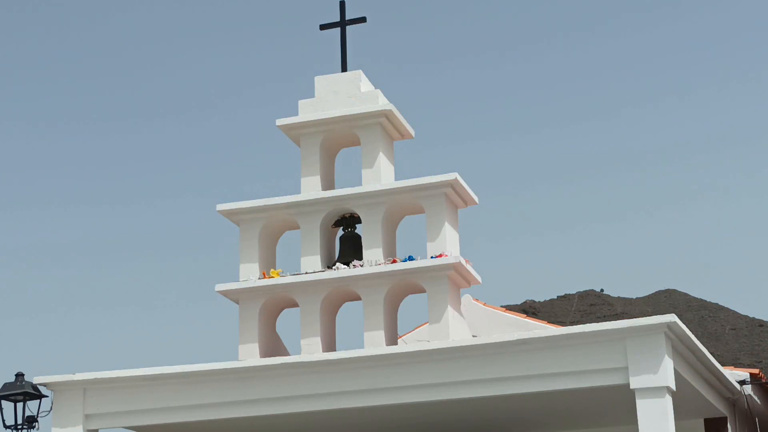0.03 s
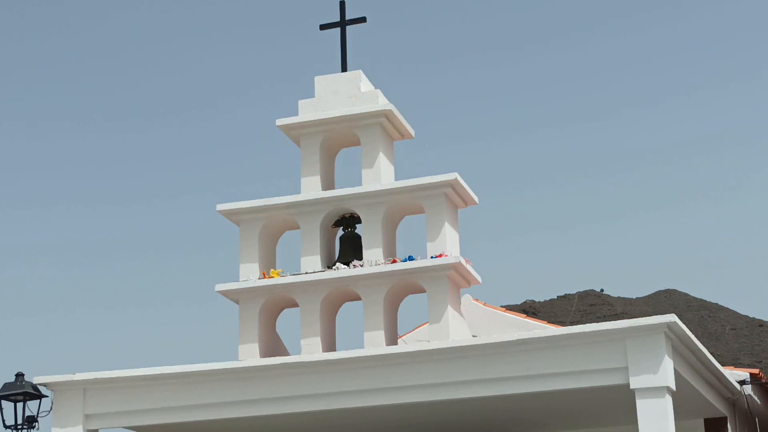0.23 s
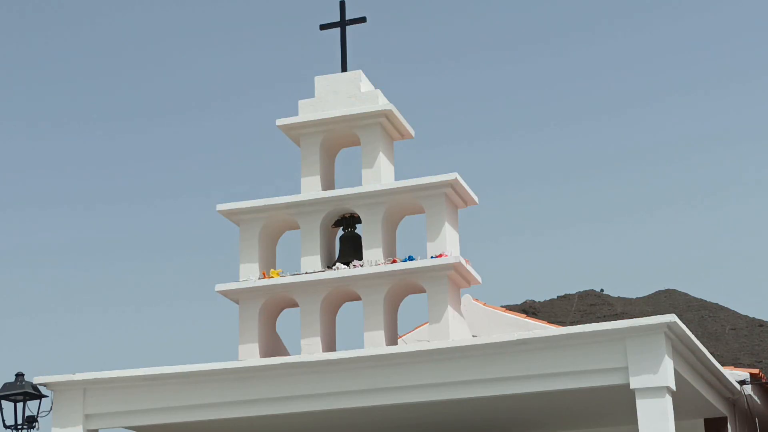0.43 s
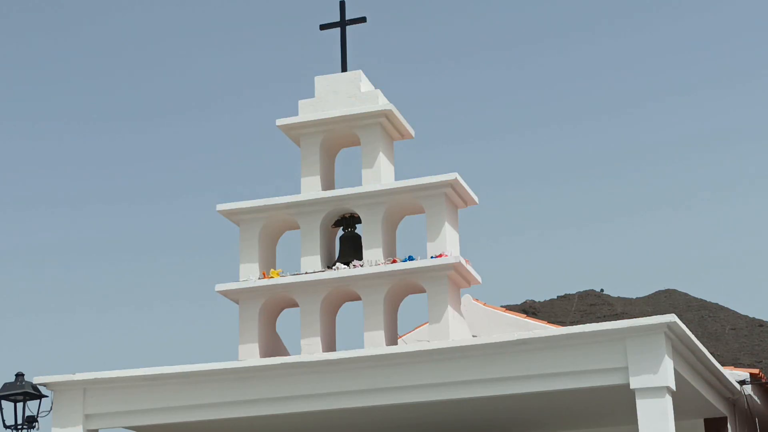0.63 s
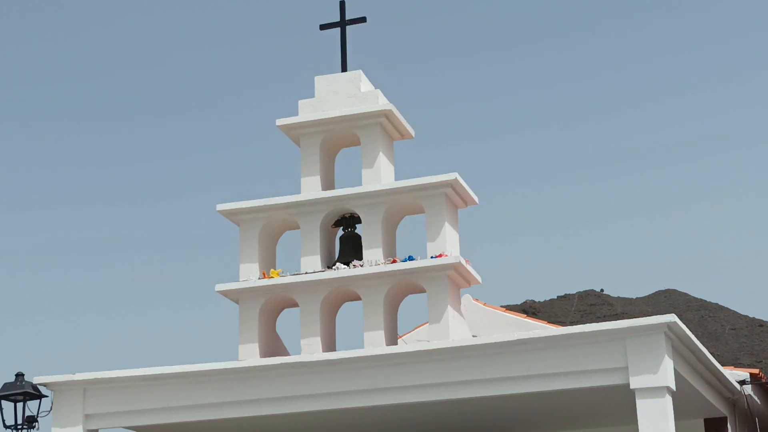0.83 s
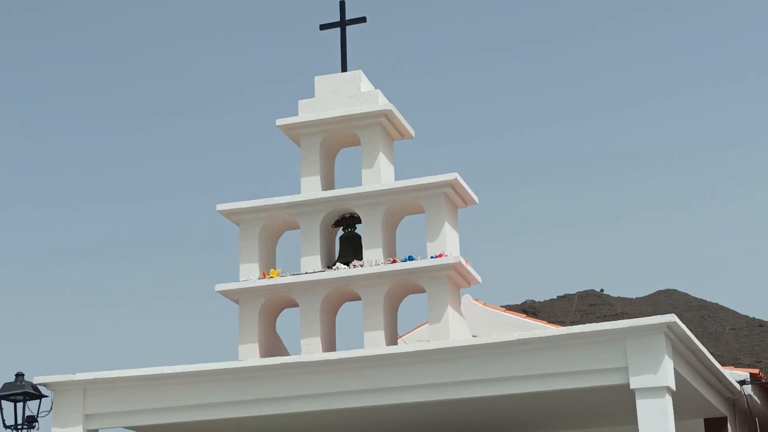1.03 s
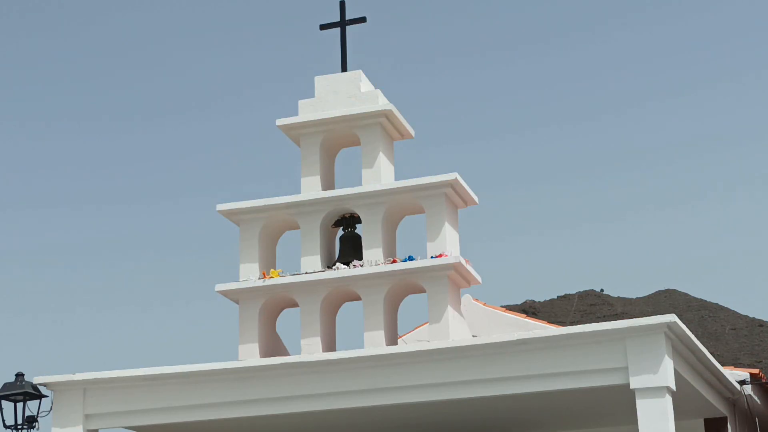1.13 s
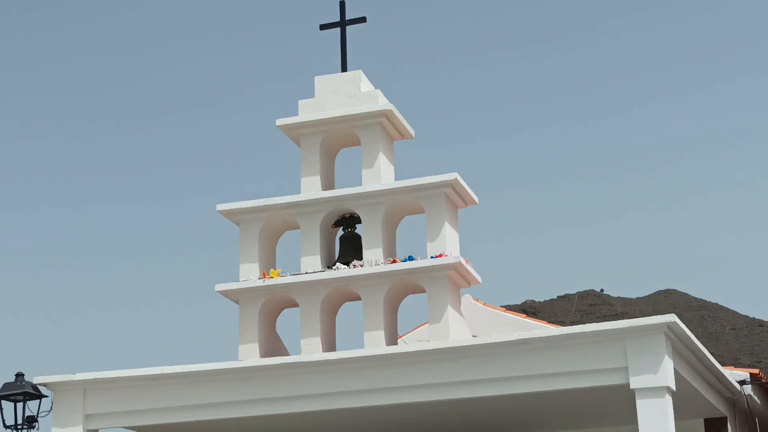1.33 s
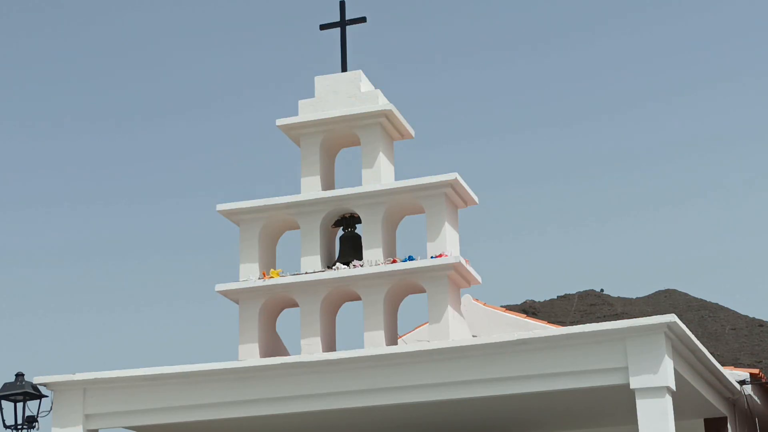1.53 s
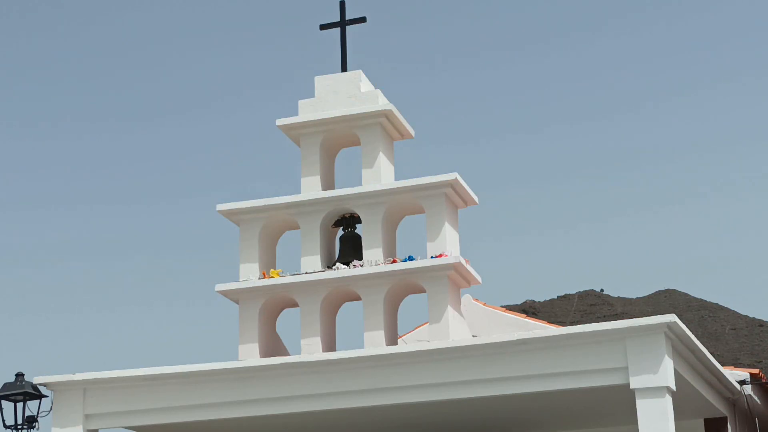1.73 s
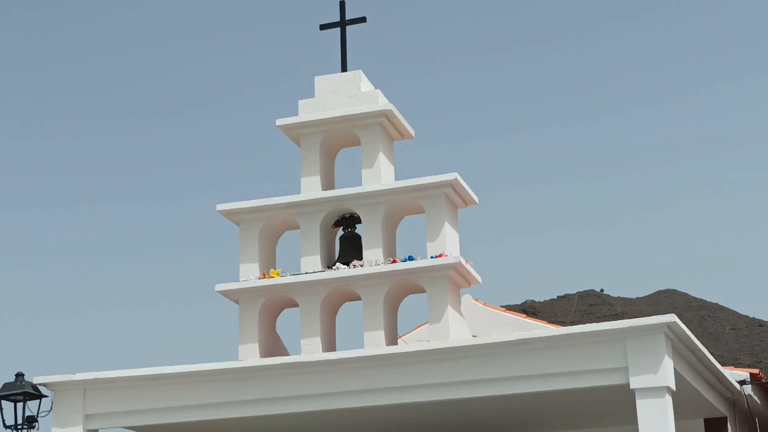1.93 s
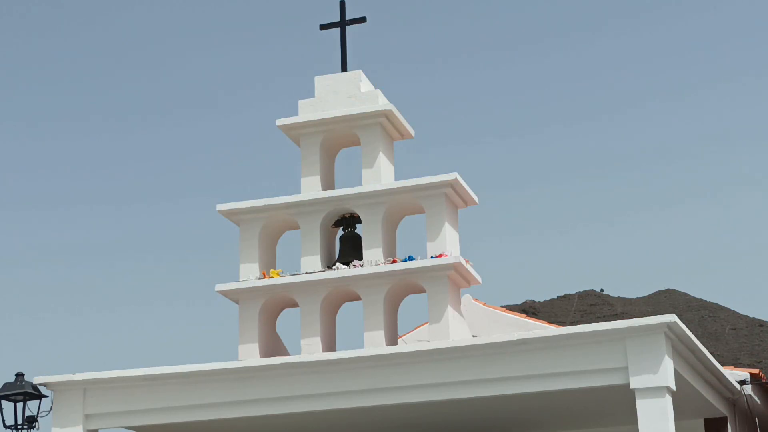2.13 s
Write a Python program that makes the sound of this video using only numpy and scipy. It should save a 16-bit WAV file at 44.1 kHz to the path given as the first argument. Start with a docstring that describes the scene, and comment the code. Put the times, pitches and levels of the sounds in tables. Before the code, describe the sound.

A small bronze church bell, still humming from an earlier stroke, is struck once early on; a hard bright clang rings and shimmers, then thins to a low hum, outdoors with light wind, in stereo.

```python
"""A small bronze bell on a chapel gable: its hum, two beating tones, still rings from the stroke before,
and two earlier partials ring as plain sines. Light wind, fluttering coloured noise and decaying sine bumps,
plays on two microphone ports over an open-air noise wash with rustles. A short coloured noise burst comes just
ahead of the one blow: a noise clank and split pairs of decaying sines that beat, while the earlier partials
fade. Walls answer with a diffuse noise tail as the ring dies away."""
import sys
import numpy as np
from scipy import signal
from scipy.fft import rfft, irfft
from scipy.io import wavfile
from scipy.ndimage import map_coordinates

SR = 44100
rng = np.random.default_rng(int(sys.argv[2]) if len(sys.argv) > 2 else 0)


def wav_out(sig):
    """Save sig, one row per channel (or a flat mono array), as 16-bit PCM at SR to the path in sys.argv[1]."""
    wavfile.write(sys.argv[1], SR, np.round(np.clip(np.atleast_2d(sig).T, -1, 1) * 32767).astype(np.int16))


def gain_from_db(level_db):
    """Convert decibel levels to linear amplitude factors (20 dB per decade)."""
    decades = np.asarray(level_db, float) / 20
    return 10 ** decades


N = 97020
T = np.arange(N) / SR
SIDES = np.array([[.5], [-.5]])  # left, right: share of any left-over-right difference
BLOW_S = .2462


def unit(x):
    """Scale to rms 1."""
    return x / np.sqrt(np.mean(x ** 2) + 1e-20)


def curves(rows):
    """One value per sample for each column after the time."""
    seconds, *columns = np.transpose(rows)
    return [np.interp(T, seconds, column) for column in columns]


def wobble(knots_per_s):
    """A smooth random curve through evenly spaced knots."""
    knots = rng.standard_normal(int(N * knots_per_s / SR) + 4)
    return map_coordinates(knots, [T * knots_per_s])


def noise(spectrum, alike):
    """Stereo noise of rms 1 with a spectrum shape; alike sets the correlation of the sides."""
    hz, db = np.transpose(spectrum)
    bins_hz = np.fft.rfftfreq(N, 1 / SR)
    gain = gain_from_db(np.interp(np.log(bins_hz + 1), np.log(hz + 1), db))
    mid, side = irfft(rfft(rng.standard_normal((2, N))) * gain, N)
    turn = np.arccos(np.clip(alike, -1, 1)) / 2
    return unit(np.cos(turn) * mid + 2 * SIDES * np.sin(turn) * side)


def burst(start_s, db, t60_s, spectrum, rise_s):
    """Centred noise that starts sharply and dies away."""
    t = np.maximum(T - start_s, 0)
    envelope = np.minimum(t / rise_s, 1) * gain_from_db(db - 60 * t / t60_s)
    return envelope * noise(spectrum, 1.0)


def pair(hz, swell_s, lead_rad, db, t60_s, pan_db, split_hz, twin_db, twin_t60_s, twin_pan_db, *troughs_s):
    """A partial and its twin, which opposes it at each side's beat trough."""
    t = np.maximum(T - BLOW_S, 0)
    phase = 2 * np.pi * (hz * t + rng.random()) + lead_rad * SIDES
    twin_phase = phase + 2 * np.pi * split_hz * (t - np.reshape(troughs_s, (2, 1)))
    partial = gain_from_db(db + pan_db * SIDES - 60 * t / t60_s) * np.sin(phase)
    twin = gain_from_db(twin_db + twin_pan_db * SIDES - 60 * t / twin_t60_s) * np.sin(twin_phase)
    swell = 1 - np.exp(-t / max(swell_s, 1e-3))
    return swell * (partial - twin)


# Strong split partials. Each row: frequency in Hz, swell time constant in s (at least 0.001 is used),
# left lead in rad, level in dB, t60 in s, left over right in dB, twin offset in Hz, twin level in dB,
# twin t60 in s, twin left over right in dB, beat trough after the blow in s on the left, then the right.
STRONG_PARTIALS = [(764.5, 0.3, -2.95, -22.3, 8.97, -1.6, -1.5, -31.9, 5.66, -1.4, 0.28, 0.079),
                   (1020.9, 0.167, 2.97, -25.1, 9.16, 0.0, 1.45, -40.6, 6.19, 8.9, 0.274, 0.022),
                   (1221.9, 0.11, -0.36, -24.4, 2.59, 3.5, 2.11, -27.6, 2.87, -0.5, 0.085, 0.109),
                   (1724.3, 0.001, -0.06, -9.5, 2.05, -0.5, -0.6, -10.9, 1.03, -1.5, 1.511, 1.606),
                   (1917.6, 0.003, -0.3, -15.6, 1.67, 0.8, -4.23, -28.5, 1.16, 2.6, 0.02, 0.022),
                   (1939.3, 0.006, -0.55, -27.6, 1.58, 7.1, 1.71, -28.2, 2.04, 1.2, 0.421, 0.383),
                   (2097.4, 0.016, 0.03, -20.0, 0.9, -2.3, -3.77, -33.8, 1.15, -1.7, 0.043, 0.058),
                   (2293.9, 0.008, -1.01, -18.8, 0.7, 3.8, 2.17, -23.5, 0.83, -5.9, 0.036, 0.46),
                   (2489.7, 0.009, 0.31, -28.6, 0.88, 8.3, 1.44, -36.4, 1.4, 0.6, 0.086, 0.277),
                   (2593.9, 0.018, -0.96, -16.5, 1.92, 6.5, 1.07, -26.9, 2.18, 9.5, 0.08, 0.219),
                   (2700.4, 0.008, 0.7, -24.9, 1.63, 6.8, -1.45, -28.4, 1.16, 11.7, 0.085, 0.066),
                   (3169.4, 0.12, -2.21, -36.1, 1.62, -4.4, -0.99, -27.5, 1.33, -3.2, 0.431, 0.813),
                   (3302.9, 0.001, -1.41, -31.1, 1.03, 1.4, -1.0, -27.4, 1.47, 1.5, 0.094, 0.02),
                   (3398.9, 0.001, -2.74, -36.0, 0.97, -5.1, -1.07, -41.1, 1.07, 16.3, 0.009, 0.452),
                   (3474.2, 0.081, -1.08, -22.9, 1.01, 0.6, -0.91, -27.8, 0.76, 9.0, 1.009, 0.213),
                   (3560.8, 0.009, 0.43, -10.0, 1.52, -1.2, 1.32, -28.2, 1.79, -3.7, 0.095, 0.121),
                   (4604.5, 0.12, -0.72, -20.4, 1.13, -7.7, -2.55, -23.4, 1.4, -4.6, 0.357, 0.349),
                   (4940.4, 0.001, 0.33, -46.6, 1.48, -2.4, -1.14, -44.8, 1.11, -2.0, 0.621, 0.569),
                   (5224.1, 0.007, 0.35, -40.4, 1.22, -3.9, 2.45, -50.7, 1.49, 1.2, 0.148, 0.16),
                   (5702.7, 0.072, -0.47, -34.7, 1.64, -6.0, 0.6, -34.6, 1.2, 4.7, 0.434, 1.0),
                   (6120.8, 0.005, -2.62, -41.1, 1.05, -6.2, -4.7, -43.8, 0.76, -15.8, 0.155, 0.011),
                   (6848.1, 0.12, -0.59, -30.6, 1.0, 7.5, -7.76, -40.3, 1.31, -14.7, 0.044, 0.09),
                   (8005.2, 0.12, -0.55, -42.4, 1.27, -0.4, -1.8, -39.5, 0.66, -12.8, 0.478, 0.088),
                   (9180.6, 0.114, -1.01, -36.2, 0.59, 6.1, -6.64, -51.8, 1.03, 6.0, 0.075, 0.039),
                   (10350.8, 0.029, 1.92, -50.1, 1.06, 20.0, -2.69, -45.3, 0.73, 7.9, 0.323, 0.257)]


def strong_partials():
    """Each bell mode splits into two close tones that beat as they decay."""
    return sum(pair(*row) for row in STRONG_PARTIALS)


# Weak upper partials. Each row: frequency in Hz, level in dB, t60 in s, left over right in dB.
WEAK_PARTIALS = [(3923, -46.5, 1.4, -2.9), (3931.5, -43.3, 1.4, -5.9), (4103.5, -43.2, 1.4, 5.1),
                 (4126, -36.2, 1.4, -1.5), (4203, -45.4, 1.4, -2.7), (4215, -47.3, 1.4, -3.4),
                 (4443, -48.0, 1.4, -5.4), (4760, -41.4, 1.03, 5.6), (5351, -43.7, 1.4, -1.3),
                 (5646, -53.2, 1.33, -8.1), (6163, -46.3, 0.87, -2.9), (6259, -50.2, 1.4, 2.1),
                 (6540, -47.0, 0.86, 0.9), (6777.5, -47.8, 1.11, 4.5), (7370, -58.4, 0.84, -14.0),
                 (8145.5, -56.4, 0.99, 5.9), (8173.5, -51.0, 1.03, 8.7), (8615, -53.6, 1.07, 12.3),
                 (8690, -57.7, 0.98, 11.6), (9821.5, -55.6, 1.02, 14.0), (9835, -55.6, 1.03, 14.0),
                 (10020, -57.9, 0.74, 14.0), (10110, -61.3, 0.97, 14.0), (10811, -61.3, 0.88, 4.8),
                 (11248, -67.8, 0.83, 12.0), (11329, -98.7, 1.4, 14.0), (11515, -55.8, 0.78, 9.0),
                 (11801.5, -61.3, 0.77, 14.0), (12399, -59.2, 0.43, 14.0), (12666, -63.8, 0.81, 8.6),
                 (13046, -79.4, 1.4, 0.8), (13825, -72.4, 0.7, 12.9), (14961, -80.6, 0.94, 8.3)]


def upper_partials():
    """Weak high modes, each split at random from a slightly weaker twin."""
    split_scale_hz, twin_db, swell_s = 4.8, -2.5, 0.0032
    out = 0
    for hz, db, t60_s, pan_db in WEAK_PARTIALS:
        split, lead, left_s, right_s = rng.uniform(-0.92, 1, size=4)
        out += pair(hz, swell_s, np.pi * lead, db, t60_s, pan_db,
                    split_scale_hz * split, db + twin_db, t60_s, pan_db, left_s, right_s)
    return out


# Partials left from the stroke before: frequencies in Hz.
EARLIER_PARTIAL_HZ = [764.5, 1021]
# Each row, one for each frequency: level in dB, left over right in dB, left lead in rad.
EARLIER_PARTIALS = [(-35.5, -1.5, 2.2), (-43, 7.5, 2.8)]


def earlier_ring():
    """Steady sines from the stroke before, fading exponentially from the blow on."""
    fade_s = 0.09
    fade = np.exp(-np.maximum(T - BLOW_S, 0) / fade_s)
    out = 0
    for hz, (db, pan_db, lead_rad) in zip(EARLIER_PARTIAL_HZ, EARLIER_PARTIALS):
        out += fade * gain_from_db(db + pan_db * SIDES) * np.sin(2 * np.pi * hz * T + lead_rad * SIDES)
    return out


def bell():
    """The new ring, and the old one that it replaces."""
    return strong_partials() + upper_partials() + earlier_ring()


# Hum through the stroke. Each row: time in s, hum level in dB, twin level in dB, left over right in dB.
HUM_LEVELS = [(0, -29.5, -44, -4.5), (.24, -31.5, -40, 2.5), (.34, -26.5, -64, 1.5),
              (.62, -24.5, -57, -2.5), (1.1, -24.5, -50.5, -2), (1.48, -25.5, -51, 3),
              (2.0, -29.5, -43.5, 2), (2.2, -30, -44, 2)]


def hum():
    """The lowest partial and its flat twin, opposed at the trough time."""
    hum_hz, twin_hz, trough_s = 447.2, 436.95, .06
    db, twin_db, pan_db = curves(HUM_LEVELS)
    turn = 2 * np.pi * (T - trough_s)
    tone = gain_from_db(db) * np.cos(hum_hz * turn)
    twin = gain_from_db(twin_db) * np.cos(twin_hz * turn)
    return gain_from_db(pan_db * SIDES) * (tone - twin)


# Hammer noise spectrum. Each row: frequency in Hz, relative level in dB.
CLANK_SPECTRUM = [(60, -34), (150, -2.5), (600, -2), (1400, -10), (2000, -7), (3500, -5), (6000, -12),
                  (10000, -23), (13500, -35.5), (15500, -79)]


def clank():
    """The hammer's noise: a fast-decaying broadband burst at the blow."""
    return burst(BLOW_S, db=-23, t60_s=.09, spectrum=CLANK_SPECTRUM, rise_s=0.00043)


# Lead-in noise spectrum. Each row: frequency in Hz, relative level in dB.
LEAD_IN_SPECTRUM = [(200, -25), (500, 10), (2500, -5), (3300, 3), (4300, -18.5), (5300, -11.5), (7000, -21),
                    (12500, -31.5), (14000, -71.5)]


def lead_in_noise():
    """A short coloured noise burst just ahead of the blow, ending at it."""
    return burst(.225, db=-27.5, t60_s=0.055, spectrum=LEAD_IN_SPECTRUM, rise_s=0.0039) * (T < BLOW_S)


def walls(x):
    """A diffuse answer from walls and hillside, mostly treble: a decaying noise response after a gap."""
    level_db, t60_s, gap_s, low_hz = -12, .4, .012, 1400
    t = np.arange(SR) / SR
    tail = rng.standard_normal((2, SR)) * gain_from_db(-60 * t / t60_s) * (t > gap_s)
    tail = tail / np.linalg.norm(tail[0])
    highpass = signal.butter(4, low_hz, "high", fs=SR, output="sos")
    bright = signal.sosfilt(highpass, x)
    return gain_from_db(level_db) * signal.fftconvolve(bright, tail, axes=1)[:, :N]


# Wind rumble spectrum. Each row: frequency in Hz, relative density in dB.
RUMBLE_SPECTRUM = [(15, -44.5), (25, -18.5), (75, -3.5), (146, -3.5), (182, -5), (286, -6), (400, -12),
                   (520, -40), (880, -120)]
# Wind strength. Each row: time in s, level in dB, left over right in dB.
WIND_LEVELS = [(0.0, -51.5, 3), (0.17, -43.5, 14), (0.28, -42.5, 4), (0.51, -48.5, 15.5),
               (0.56, -39.5, 1.5), (1.14, -47.5, 0), (1.35, -48.5, 8), (1.65, -46.5, -1.5), (1.79, -48, 2),
               (2.2, -47, 4)]


def wind_rumble():
    """Low noise on the ports, fluttering separately on each side."""
    flutter_db, flutter_knots_per_s, alike = 3, 14, .3
    db, pan_db = curves(WIND_LEVELS)
    flutter = gain_from_db(flutter_db * np.array([wobble(flutter_knots_per_s), wobble(flutter_knots_per_s)]))
    return gain_from_db(db + pan_db * SIDES) * unit(flutter * noise(RUMBLE_SPECTRUM, alike))


# Wind bumps. Each row: start in s, envelope peak in dB, frequency in Hz, left over right in dB.
WIND_BUMPS = [(0.169, -45, 56, 14), (0.493, -42.5, 96.7, 29), (0.517, -42, 61.9, 25),
              (0.72, -37.5, 75.4, 2.5), (0.939, -46, 64.6, 1.0), (1.117, -42, 162, -3),
              (1.328, -45.5, 76.7, 18), (1.617, -40, 51.1, -16.5)]


def wind_bumps():
    """Single low sine pulses on the ports that swell and die."""
    peak_after_s = 0.009
    out = 0
    for start_s, peak_db, hz, pan_db in WIND_BUMPS:
        u = np.maximum(T - start_s, 0) / peak_after_s
        pulse = u * np.exp(1 - u) * np.sin(2 * np.pi * hz * (T - start_s))
        out += gain_from_db(peak_db + pan_db * SIDES) * pulse
    return out


def wind():
    """Fluttering rumble and single bumps on the ports."""
    return wind_rumble() + wind_bumps()


# Open-air spectrum. Each row: frequency in Hz, relative density in dB.
AIR_SPECTRUM = [(150, -36.5), (300, -2), (600, -2), (1000, -11.5), (2000, -9.5), (3000, -14.5), (5000, -23),
                (8000, -36.5), (13000, -44), (15300, -61.5)]
# Open-air strength. Each row: time in s, level in dB before the random wobble.
AIR_LEVELS = [(0, -51.5), (.4, -44.5), (.8, -41.5), (1.3, -49.5), (1.7, -49.5), (2.2, -50)]


def air():
    """The distant wash: wide coloured noise with a slight level wobble."""
    pan_db, alike, wobble_db, knots_per_s = 2.5, 0.2, 0.42, 4.4
    db, = curves(AIR_LEVELS)
    level = gain_from_db(db + pan_db * SIDES + wobble_db * wobble(knots_per_s))
    return level * noise(AIR_SPECTRUM, alike)


# Rustle spectrum. Each row: frequency in Hz, relative level in dB.
RUSTLE_SPECTRUM = [(150, -44.5), (300, -9.5), (700, -3), (2000, -18.5), (8000, -28), (13000, -49),
                   (15500, -69)]
# Faint rustles nearby. Each row: centre in s, level in dB, Gaussian length in s, low-pass cutoff in Hz.
RUSTLE_EVENTS = [(0.577, -32.5, 0.0072, 900), (0.716, -42.5, 0.029, 12000), (1.482, -51.5, 0.0084, 14000),
                 (1.595, -53, 0.048, 7000)]


def rustles():
    """Soft puffs of low-passed noise under Gaussian envelopes."""
    out = 0
    for centre_s, db, length_s, top_hz in RUSTLE_EVENTS:
        lowpass = signal.butter(4, top_hz, fs=SR, output="sos")
        puff = signal.sosfilt(lowpass, noise(RUSTLE_SPECTRUM, 1.0))
        out += gain_from_db(db) * np.exp(-((T - centre_s) / length_s) ** 2) * puff
    return out


def scene():
    """Bell, hammer, lead-in noise, walls, hum, wind, air and rustles."""
    struck = bell() + clank() + lead_in_noise()
    return struck + walls(struck) + hum() + wind() + air() + rustles()


def top_cut(x):
    """Nothing passes above the cut-off."""
    return signal.sosfilt(signal.butter(12, 15480, fs=SR, output="sos"), x)


def record(dry):
    """The microphones' low cut on the finished mix."""
    low_cut_hz = 45
    highpass = signal.butter(2, low_cut_hz, "high", fs=SR, output="sos")
    mix = signal.sosfilt(highpass, dry)
    return top_cut(mix)


dry = scene()
out = record(dry)
wav_out(out)
```